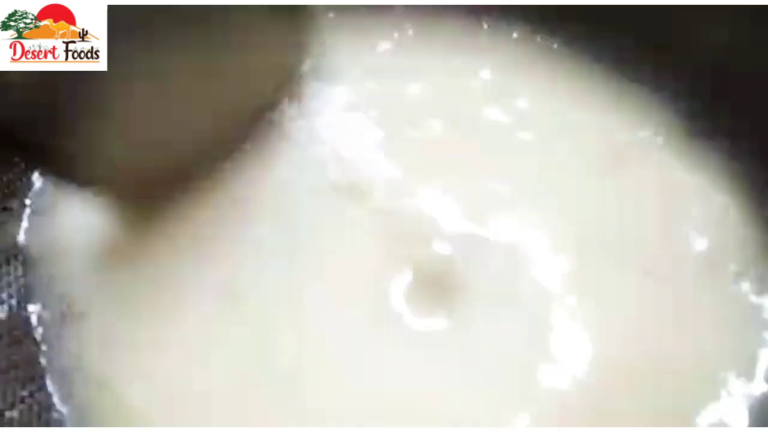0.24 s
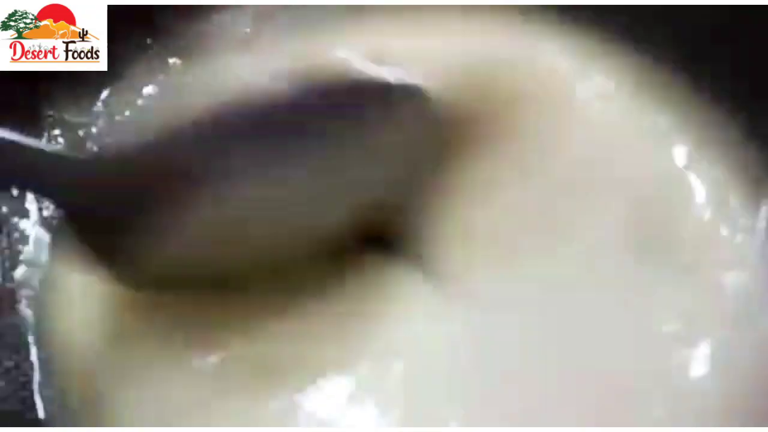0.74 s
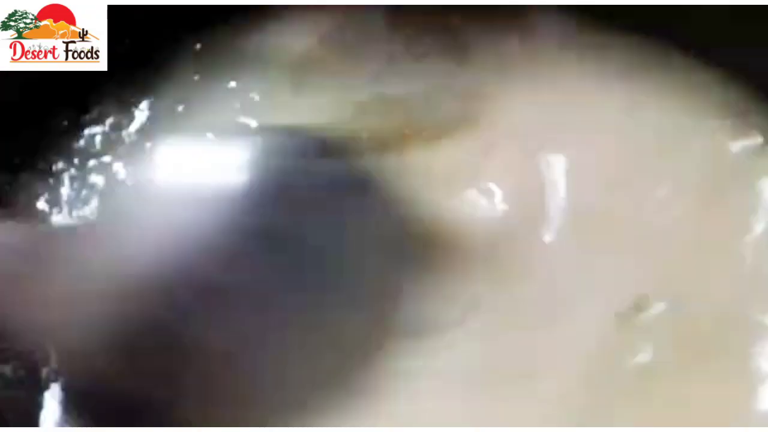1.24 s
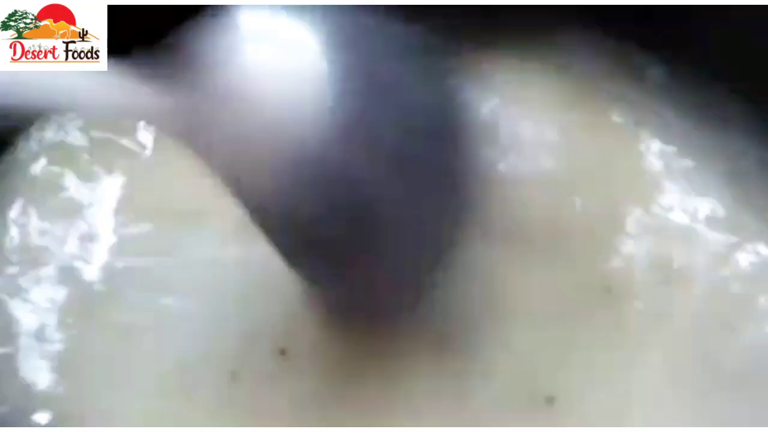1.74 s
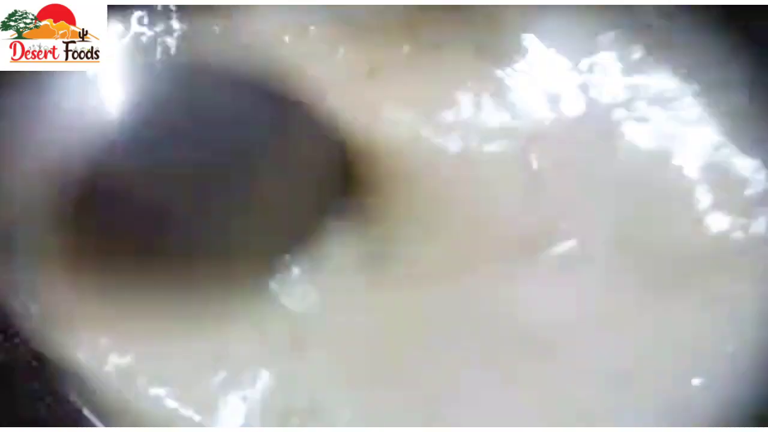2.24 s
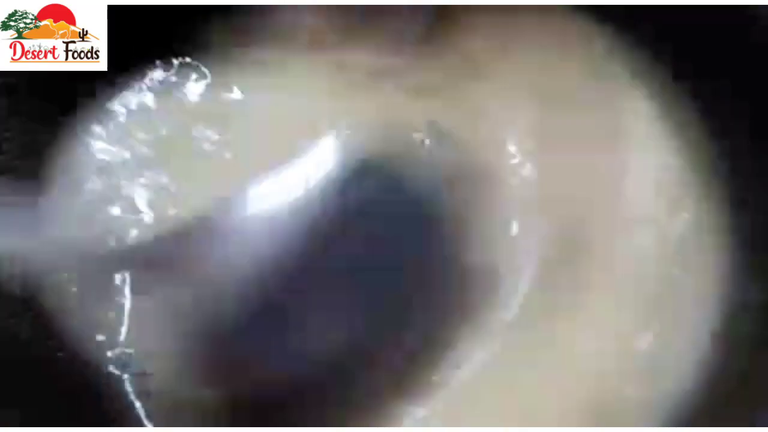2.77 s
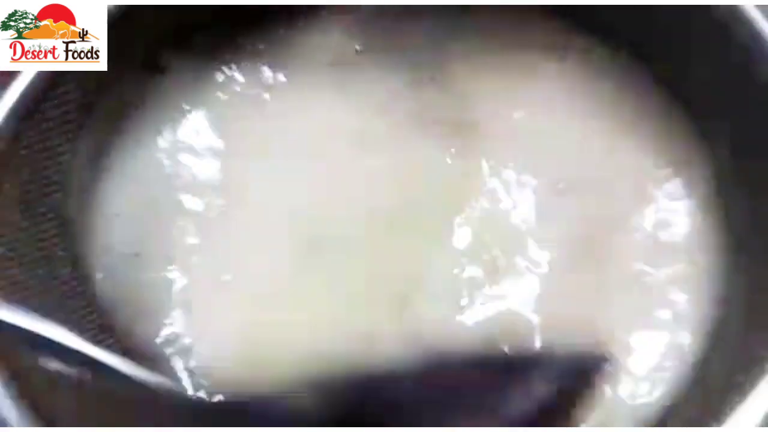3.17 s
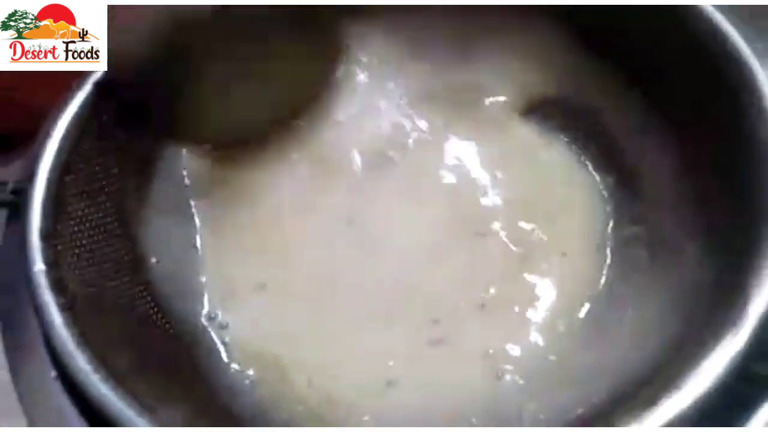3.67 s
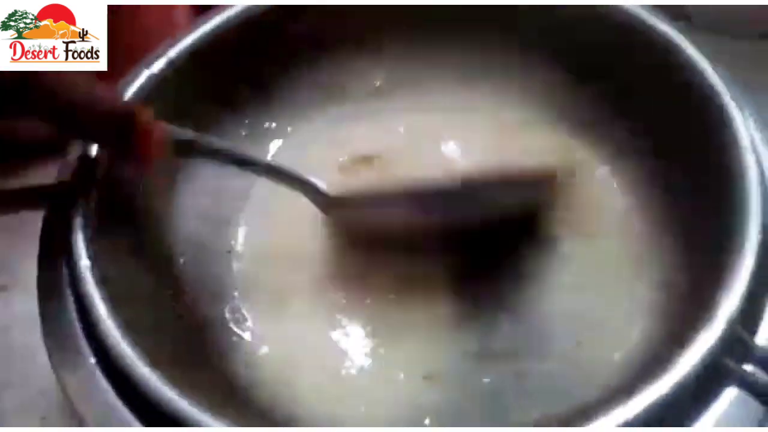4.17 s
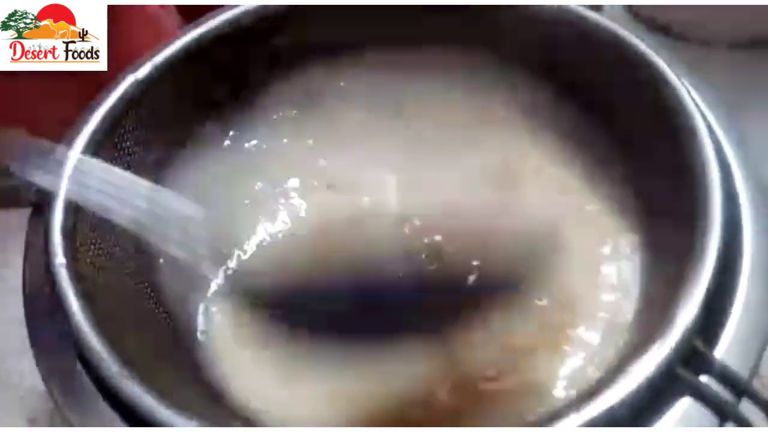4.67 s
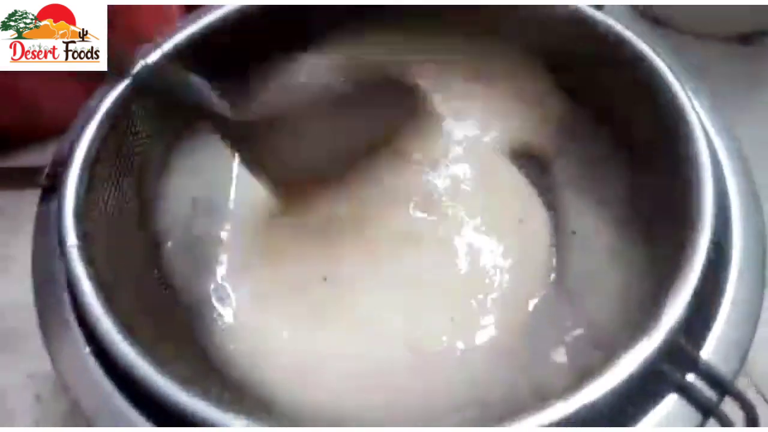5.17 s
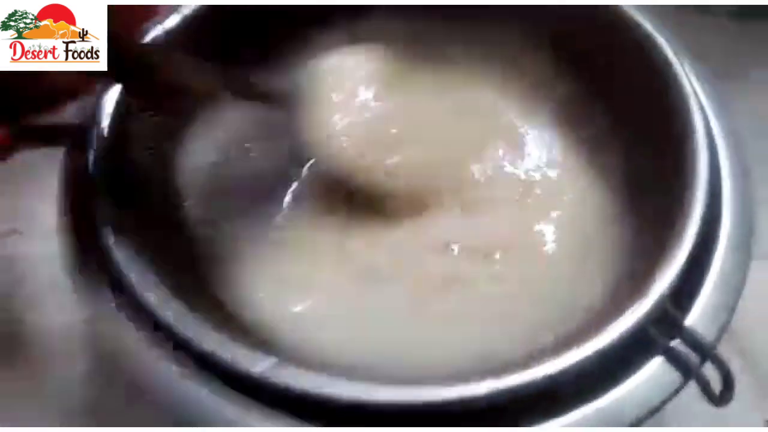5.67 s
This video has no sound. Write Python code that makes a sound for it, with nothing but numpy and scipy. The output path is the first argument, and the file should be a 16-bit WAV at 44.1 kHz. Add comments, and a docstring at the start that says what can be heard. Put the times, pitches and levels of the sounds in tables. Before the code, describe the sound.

Close up in a small kitchen, a steel spoon stirs thick pulp in a mesh strainer over a pot. The first second is quiet, with small ticks, wet gulps and a loud pot knock with rattle. Then gritty, squelching strokes come about three a second, later slowing to separate longer scrapes that soften at the end. Faint hiss and room tone sit behind.

```python
"""A steel spoon stirs wet pulp through a mesh strainer that sits on a pot, close by in a small kitchen.
Each stroke rasps: noisy slips ring the strainer's resonances while the loaded basket hums on gliding modes.
The pulp squelches in falling chirps, gulps and crackles; the spoon ticks on the steel and briefly squeaks.
Early on the pot knocks on the counter and rocks back, in ringing modes, rattle and low bumps.
The walls answer with a decaying noise tail; filtered noise makes a soft hiss and a low room tone."""
import sys
import numpy as np
from scipy import signal
from scipy.fft import rfft, irfft, next_fast_len
from scipy.io import wavfile
from scipy.ndimage import uniform_filter1d, minimum_filter1d

SR = 44100
rng = np.random.default_rng(int(sys.argv[2]) if len(sys.argv) > 2 else 0)


def put_to_file(sound):
    """Save the sound as 16-bit audio at rate SR, in the file named by the first command-line argument."""
    columns = np.atleast_2d(sound).T  # one column per channel
    safe = np.clip(columns, -1, 1)
    whole_steps = np.round(safe * 32767)
    wavfile.write(sys.argv[1], SR, whole_steps.astype(np.int16))


N = 260684  # length in samples

# The spoon pushes into the mesh. Each row: start, rise, hold and release in seconds, easing over the hold
# in dB, relative rasp, basket hum and wire sizzle in dB, lag of the hum in seconds, swell of the hum in dB,
# squelch pitch at the start in Hz.
PUSHES = [ (0.251, 0.012, 0.03, 0.13, 3, -41.5, -38.5, -40, -0.016, 12, 1900),
          (0.63, 0.06, 0.064, 0.097, 1, -41, -43, -36, -0.0031, 27, 1950),
          (1.018, 0.011, 0.15, 0.15, -2.5, -41, -37.5, -35, -0.0066, 2.5, 2000),
          (1.403, 0.08, 0.013, .06, -0.5, -17, -23.5, -21.5, -0.008, 0, 1914),
          (1.736, 0.046, 0.05, 0.084, 2, -21.5, -27, -26, -.012, -13, 2036),
          (2.047, 0.067, .028, 0.063, -1.5, -18.5, -23, -23, -.035, -2, 2246),
          (2.362, .065, 0.022, 0.073, 0, -14, -24.5, -22, -.025, -6, 2325),
          (2.66, .08, .02, 0.053, -1, -15.5, -25.5, -20, -.03, -12, 2146),
          (2.983, 0.067, 0.011, 0.055, 0, -17.5, -29, -18.5, 0.016, 8, 2362),
          (3.33, 0.031, 0.16, 0.05027, 7, -15, -32, -26.5, .03, 9.5, 2664),
          (3.706, .02, 0.1146, .08, -1, -20.5, -32.5, -40, 0.026, 10, 2449),
          (4.125, 0.0573, 0.013, 0.082, -0.5, -16.5, -33.5, -29.5, 0.018, 4, 2652),
          (4.47, 0.017, 0.11, 0.055, -2, -21, -28, -36, -0.0039, 5, 2343),
          (4.87, .03, 0.014, .165, 0.5, -14, -28, -29.5, 0.018, 10, 2265),
          (5.186, .022, 0.095, .07, -0.5, -24.5, -34, -45, .012, 2, 2442),
          (5.667, 0.044, .016, .13, -1, -27.5, -33.5, -45, 0.018, -9, 2494), ]
# The spoon slides lightly back through the pulp. Each row: start and length in seconds,
# relative rasp, basket hum and wire sizzle in dB.
RETURNS = [(1.321, 0.098, -119, -30.5, -46), (1.589, 0.031, -33, -24.5, -36), (1.65, 0.044, -36, -22, -31),
           (1.919, 0.036, -30, -31.5, -38), (1.968, 0.056, -34, -23.5, -27),
           (2.251, .035, -29, -38.5, -34.5), (2.308, 0.034, -36, -30.5, -30), (2.572, .05, -28, -35, -32),
           (2.849, 0.04, -24, -38, -28), (2.936, 0.029, -29, -26.5, -26.5), (3.282, 0.053, -43, -81, -33),
           (4.808, 0.035, -45.5, -55.5, -46), (5.529, 0.024, -42.5, -64, -48)]
# During the quick stirring the spoon never leaves the mesh. One row: start and length in seconds,
# relative rasp, basket hum and wire sizzle in dB.
DRAG = (1.3, 1.5, -52, -48, -39.5)
# Broad resonances of rim, spoon and wires. Each row: pitch in Hz, width of each of two passes in Hz,
# relative level in dB.
STRAINER = [(83.5, 240, -32), (767.7, 42, -8.5), (1028, 310, -14.5), (1250, 170, -1), (1739, 194, -9.5),
            (2017, 216, -4.5), (2476, 410, -2.5), (2766, 140, -6), (3600, 710, -10.5), (4115, 760, -8.5),
            (4370, 85, -18.5), (5170, 1400, -8.5), (6470, 760, -8.5), (8400, 2700, -2), (10670, 1800, -7.5),
            (12800, 1100, -13)]
# Stereo width of the scrape. Each row: frequency in Hz, side level against the middle in dB.
SCRAPE_WIDTH = [(2800, -83), (4300, -58), (7000, -11.5), (12000, -5.5)]
# Treble slope of the scrape about 8 kHz. Each row: time in seconds, slope in dB per octave.
BRIGHTNESS = [(1.2, 2.5), (1.8, -2), (2.4, -1), (2.95, 4), (3.4, -3.5), (4.55, -4.5), (5.27, 4.5)]
# The basket's modes. Each row: multiple of its note, width of each of two passes in Hz, relative level in dB.
BASKET_MODES = [(.58, 56, -24.5), (.88, 74, -10), (1, 68, -7.5), (1.17, 107, -9.5)]
# Air pockets gulping in the pulp. Each row: start in seconds, peak in dB, middle pitch in Hz,
# length in seconds.
GULPS = [(0.688, -19, 600, 0.028), (0.725, -21, 618, 0.0172), (0.743, -24, 544, 0.0155),
         (1.167, -24, 604, 0.027), (1.325, -28, 601, 0.026), (1.687, -22, 670, 0.012),
         (1.989, -15, 645, 0.0346), (2.616, -21.5, 636.4, 0.017), (2.955, -21, 729, 0.016),
         (3.513, -19, 780, 0.037), (3.856, -31, 744, .028), (4.922, -18, 954, 0.027)]
# Spoon edge on steel. Each row: start in seconds, relative bright tick in dB, relative dull clack in dB,
# clack pitch in Hz.
TICKS = [(0.2604, -11.5, -26, 2080), (0.632, -13.5, -26, 2730), (0.987, -12, -59.5, 2220),
         (1.029, -17, -39, 2290), (1.3067, -14, -46, 1834), (1.36, -19, -57, 2100),
         (1.6064, -34, -30, 2920), (1.664, -13, -29.5, 2680), (2.255, -36, -32, 2740),
         (2.323, -2.5, -50, 2510), (2.6427, -2.5, -31, 2540), (2.929, -10, -29, 1990),
         (2.9405, -17, -44, 1597), (3.262, 3.5, -46.5, 2250), (3.2851, -20, -32, 2300),
         (3.2938, 1, -35, 2130), (3.7109, -23, -24.5, 2104), (4.0892, -19.5, -40, 2310),
         (4.373, -26.5, -50, 2050), (4.475, -16, -17.5, 2110), (4.5446, -23, -10, 2070),
         (4.55, -10, -11.5, 2293), (4.8053, -23, -28, 2600), (5.2018, -50, -27, 2040),
         (5.53, -21.5, -29, 2310)]
# The spoon's edge on a wire. Each row: pitch in Hz, width in Hz, relative level in dB.
EDGE_MODES = [(6980, 490, -4.5), (9000, 4000, -11.5), (10250, 2300, -8.5), (11300, 2000, -40)]
# The spoon's tip skating over the wires. Each row: start in seconds, level in dB, length in seconds,
# pitch in Hz.
SKITTERS = [(2.32, -23.5, 0.018, 7830), (2.93, -21, 0.032, 8276), (2.931, -27, 0.029, 11730)]
# Pot on the counter. Each row: start in seconds, rms of the first 10 ms in dB.
KNOCKS = [(0.385, -30), (0.391, -7), (0.4888, -18.5), (0.5241, -20.5)]
# The pot's modes. Each row: pitch in Hz, relative level in dB, time to fall 60 dB in seconds.
POT_MODES = [(152, -34, 0.24), (281.4, -27.5, 0.32), (429, -15, 0.087), (668, -7, 0.06), (984, -0.5, 0.041),
             (1027, 11.5, 0.016), (1357, -10.5, 0.066), (1643, -13.5, 0.083), (1960, -16, 0.045),
             (2210, -30.5, 0.23), (2570, -13, 0.052), (5540, -13, 0.025), (7680, -13, 0.057)]
# Spectrum of the loose strainer's rattle. Each row: frequency in Hz, relative level in dB.
RATTLE_SPECTRUM = [(29, -53), (50, -17.5), (272, -25), (356, -28), (446, -2), (511, -22), (612, -2),
                   (840, -18), (1010, -7), (1650, -10.5), (2120, -23), (2370, -18), (3400, -39),
                   (7840, -36), (11000, -41), (14300, -74), (22000, -120)]
# Soft bumps of the pot. Each row: start in seconds, relative level in dB, pitch in Hz.
BUMPS = [(0.3839, -7, 260), (0.486, -11, 267), (0.516, -12.5, 250), (3.932, -33.5, 107),
         (3.963, -31, 141.5), (4.131, -36, 89.8), (4.487, -39, 88), (4.551, -41, 74.8), (4.8, -38, 120),
         (5.22, -41.5, 89), (5.849, -40.5, 78.6)]
# Decay of the kitchen. Each row: frequency in Hz, time to fall 60 dB in seconds.
KITCHEN_DECAY = [(150, 0.68), (700, 0.35), (2200, 0.44), (5000, 0.52), (12000, 0.065)]
# Spectrum of the room tone. Each row: frequency in Hz, relative level in dB.
ROOM_SPECTRUM = [(20, -40), (40, -21), (65, 4), (120, -20.5), (210, -13.5), (295, 2.5), (370, -13),
                 (560, -3), (720, 1.5), (1500, -4), (2700, -8), (4500, -23), (8000, -29.5), (14500, -26.5)]
# Spectrum of the hiss. Each row: frequency in Hz, relative level in dB.
HISS_SPECTRUM = [(2350, -61), (4000, -48), (5050, -36), (5190, -42), (7680, -22), (8820, -23), (13700, -46),
                 (15000, -92)]
# Loudness of the hiss. Each row: time in seconds, level in dB.
HISS_LEVEL = [(0, -46), (0.9, -53), (2.498, -51), (3.199, -51.5), (3.7, -71), (5.9, -66.5)]

RETURN_RISE_S, RETURN_RELEASE_S = 0.02477, 0.04124
EDGE_DB = 22  # a stroke climbs this far in its rise and drops as far in its release
RELEASE_CURVE = 1.1  # exponent: the hand lets go gently, then faster
FOLLOW_THROUGH_S = 0.043  # the spoon keeps travelling after the hand eases
REST_DB = -72  # the pulp settling between strokes
GLANCING_HZ = 2160  # the squelch where the spoon only slides
SQUELCH_FALL_OCT_PER_S = 3.81  # as the spoon digs in
# the basket's note: pressed firmly when full, its rise as pulp drains, its rise with the spoon's pressure
BASKET_HZ, DRAIN_HZ_PER_S, TENSION_HZ_PER_DB = 678.8, 19, 3.5
SLACK_DB, FIRM_DB = -43, -21  # rasp at which the mesh hangs slack, and at a firm press
TOP_HZ = 14350  # band limit


def force_db(age, rise, hold, release):
    """The hand's force through one stroke, in dB below its top."""
    before_top = np.maximum(1 - age / rise, 0) ** 2
    after_hold = (np.maximum(age - rise - hold, 0) / release) ** RELEASE_CURVE
    return -EDGE_DB * np.minimum(before_top + after_hold, 10)


def stroke_controls():
    """Hum, rasp and sizzle gains and squelch pitch: strokes rise, hold and release as the squelch falls."""
    t = np.arange(N) / SR
    light = [(s, RETURN_RISE_S, length - RETURN_RISE_S, RETURN_RELEASE_S, 0, *levels, 0, 0, GLANCING_HZ)
             for s, length, *levels in RETURNS]
    start, length, *drag_db = DRAG
    dragging = force_db(t - start, RETURN_RISE_S, length, RETURN_RELEASE_S)
    # strokes add up as powers
    rasp, hum, sizzle = [amp(db + dragging) ** 2 + amp(REST_DB) ** 2 for db in drag_db]
    pitch = rasp * GLANCING_HZ  # averaged with the rasp power as weight
    for (s, rise, hold, release, easing_db, rasp_db, hum_db, sizzle_db,
         lag, swell_db, start_hz) in PUSHES + light:
        age = t - s
        moving_s = rise + hold + FOLLOW_THROUGH_S
        dug_s = np.clip(age, 0, moving_s)
        easing = easing_db * np.interp(age, [rise, rise + abs(hold)], [.5, -.5])
        force = force_db(age, rise, hold, release) + easing
        push = amp(rasp_db + force) ** 2
        rasp = rasp + push
        sizzle = sizzle + amp(sizzle_db + force) ** 2
        swell = swell_db * (dug_s / moving_s - .5)
        hum = hum + amp(hum_db + force_db(age - lag, rise, hold, release) + swell) ** 2
        pitch = pitch + push * start_hz * 2 ** (-SQUELCH_FALL_OCT_PER_S * dug_s)
    return np.sqrt(hum), np.sqrt(rasp), np.sqrt(sizzle), pitch / rasp


def scraping(hum, rasp, sizzle, squelch_hz, smear=0.94, lumps_db=2.12, below_db=22, above_db=7):
    """The spoon slips over the wires, and the slips ring the whole strainer."""
    out = np.zeros((2, N))
    slips = snaps(rate=2400, scatter_db=-0.5)
    lumps = lumps_db * wobble(170)
    slope_db = np.interp(np.arange(N) / SR, *np.transpose(BRIGHTNESS))
    for hz, width, db in STRAINER:
        drive = slips + smear * rng.standard_normal(N)  # wet pulp smears the slips into noise
        ring = unit(steep(drive, hz, width))
        side = amp(along(SCRAPE_WIDTH, hz)) * unit(steep(rng.standard_normal(N), hz, width))
        # low resonances follow the flexing basket, high ones the wires, the middle ones the spoon's pressure
        low = along([(900, 0.36), (2000, 0.026)], hz)
        high = along([(2700, 0.18), (6000, 1.0)], hz)
        level = hum ** low * sizzle ** high * rasp ** (1 - low - high)
        # middle resonances below the pitch of the pocket under the spoon stay shut, so a push opens downward
        focus_db = np.where(hz < squelch_hz, below_db, above_db)
        in_middle = 1100 < hz < 3000
        detuning = in_middle * np.minimum(np.log2(hz / squelch_hz) ** 2, 1)
        treble_octaves = (hz > 3000) * np.log2(hz / 8000)
        shade_db = db + lumps - focus_db * detuning + slope_db * treble_octaves
        out += level * amp(shade_db) * stereo(ring, side)
    return amp(-2.5) * patchy(out, depth_db=4.0)


def patchy(x, depth_db):
    """Shifting pulp damps patches of the spectrum for some milliseconds at a time."""
    z = signal.stft(x, nperseg=256)[2]
    field = uniform_filter1d(rng.standard_normal(z.shape[1:]), size=2, axis=0)  # across frequency
    field = uniform_filter1d(field, size=6, axis=1)  # across time
    y = signal.istft(z * amp(depth_db * unit(field)), nperseg=256)[1][:, :N]
    return y * np.std(x) / np.std(y)


def basket_note(rasp):
    """The note climbs as the pulp drains, and whenever the spoon pulls the mesh taut."""
    pressure_db = np.maximum(20 * np.log10(rasp), SLACK_DB) - FIRM_DB
    return BASKET_HZ + DRAIN_HZ_PER_S * np.arange(N) / SR + TENSION_HZ_PER_DB * pressure_db


def basket(hum, note_hz, unevenness_db=2):
    """The loaded basket hums; its modes slide together with its note."""
    cycles = np.cumsum(note_hz) / SR
    out = np.zeros(N)
    for multiple, width, db in BASKET_MODES:
        # slow noise on a cosine and a sine makes a narrow band that can glide
        slow = filtered(rng.standard_normal((2, N)), lambda f: 1 / (1 + 2j * f / width) ** 2)
        a, b = unit(slow)
        phase = 2 * np.pi * multiple * cycles
        out += amp(db) * (a * np.cos(phase) + b * np.sin(phase))
    return hum * amp(unevenness_db * wobble(60)) * out


def squelches(rasp, squelch_hz, count=900, length=0.023, sag=0.066):
    """Small pockets open in the pulp under the spoon, each a short falling chirp."""
    out = np.zeros(N)
    for when, pitch, size in rng.random((count, 3)):
        i = int(when * (N - 1))
        hz = squelch_hz[i] * np.interp(pitch, [0, 1], [.68, 1.06])
        add(out, i / SR, rasp[i] * size * bubble(hz, length, sag))
    return amp(-3.5) * out


def wet_crackle(sizzle, growth=0.64):
    """Thin films of pulp snap on the mesh wherever the spoon moves."""
    return amp(-24.5) * sizzle ** growth * unit(ringing(snaps(rate=130, scatter_db=5.5), EDGE_MODES))


def gulps():
    """Large air pockets behind the spoon."""
    out = np.zeros(N)
    for s, db, hz, length in GULPS:
        add(out, s, amp(db) * bubble(hz, length, sag=0.18))
    return out


def bubble(hz, length, sag):
    """A pocket of air that swells and fades, its pitch sagging as it opens."""
    u = np.linspace(0, 1, int(length * SR))
    cycles = np.cumsum(hz * (1 + sag * (.5 - u))) / SR
    return np.sin(np.pi * u) * np.sin(2 * np.pi * cycles)


def ticks():
    """A short contact rings the spoon's edge and, when firm, the strainer's rim."""
    out, t = np.zeros(N), np.arange(SR // 10) / SR
    for s, tick_db, clack_db, clack_hz in TICKS:
        # a fast decay over a quieter, slower one
        blow = rng.standard_normal(len(t)) * (amp(-60 * t / 0.0055) + amp(-13 - 60 * t / 0.075))
        blow[0] += amp(15.5)  # the contact itself, ahead of its grit
        edge = ringing(blow, EDGE_MODES)
        rim = steep(blow, clack_hz, width_hz=500)
        tick = amp(tick_db - 6.0) * edge / np.abs(edge).max()
        clack = amp(clack_db + 6.5) * rim / np.abs(rim).max()
        add(out, s, tick + clack)
    return out


def skitters():
    """The tip skates for a moment: a thin, gritty squeak of narrow-band noise."""
    out = np.zeros(N)
    for s, db, length, hz in SKITTERS:
        u = np.linspace(0, 1, int(length * SR))
        grit = unit(steep(rng.standard_normal(len(u)), hz, width_hz=1120))
        add(out, s, amp(db) * np.sqrt(4 * u * (1 - u)) * grit)
    return out


def pot_knocks(dulling=0.26):
    """The pot strikes the counter, softer blows sounding duller; the loose strainer rattles on after each."""
    out, t = np.zeros(N), np.arange(SR) / SR
    for s, db in KNOCKS:
        ring = np.zeros(len(t))
        for hz, level, t60 in POT_MODES:
            tilt_db = dulling * db * max(np.log2(hz / 2000), 0)
            mode_db = level + rng.normal(0, 1) + tilt_db - 60 * t / t60
            ring += amp(mode_db) * np.sin(2 * np.pi * hz * t)
        # a harder blow shakes the strainer more
        rattle = amp(-13.5 + .5 * db - 60 * t / 0.65) * coloured(rng.standard_normal(len(t)), RATTLE_SPECTRUM)
        blow = (ring + rattle) * (1 - np.exp(-t / 0.0022))
        add(out, s, amp(db) * blow / np.std(blow[:SR // 100]))
    return out


def pot_bumps():
    """A soft push on the pot: a few low cycles, 60 dB down after nine."""
    out, t = np.zeros(N), np.arange(SR // 4) / SR
    for s, db, hz in BUMPS:
        decay = amp(db - 2.0 - 60 * t * hz / 9)
        add(out, s, decay * np.sin(2 * np.pi * hz * t) * (1 - np.exp(-t / 0.0013)))
    return out


def kitchen(x):
    """Hard walls answer; each frequency dies at its own speed."""
    hz, t, z = signal.stft(rng.standard_normal(SR), SR, nperseg=256)
    decay = amp(-60 * t / along(KITCHEN_DECAY, hz)[:, None])
    tail = signal.istft(z * decay, SR, nperseg=256)[1]
    tail = tail * (1 - np.exp(-np.arange(len(tail)) / SR / 0.0009))
    wet = signal.fftconvolve(x, tail[None] / np.linalg.norm(tail), axes=1)[:, :N]
    return filtered(wet, lambda f: amp(along([(200, 7), (2200, -2.0), (4000, -9), (12000, 5)], f)))


def background():
    """Room tone with a faint hum, and a high hiss that fades away past halfway, all filtered noise."""
    noise = lambda: rng.standard_normal(N)
    tone = amp(-49.5) * coloured(noise(), ROOM_SPECTRUM)
    faint_hum = amp(-61.5) * unit(ringing(noise(), [(94, 49, -11.0), (293, 17, -3.5)]))
    hiss = stereo(coloured(noise(), HISS_SPECTRUM), amp(-18) * coloured(noise(), HISS_SPECTRUM))
    hiss_gain = amp(np.interp(np.arange(N) / SR, *np.transpose(HISS_LEVEL)))
    return tone + faint_hum + hiss_gain * hiss


def amp(db):
    """Decibels to gain."""
    return 10 ** (np.asarray(db) / 20)


def unit(x):
    """Scale to rms 1."""
    return x / np.sqrt(np.mean(x ** 2) + 1e-20)


def along(points, hz):
    """(Hz, value) points read on a log axis."""
    f, v = np.transpose(points)
    return np.interp(np.log(hz + 1), np.log(f + 1), v)


def filtered(x, response):
    """x times a response of frequency."""
    size = x.shape[-1]
    m = next_fast_len(size + SR // 2)  # padded, so that ringing does not wrap round
    return irfft(rfft(x, m) * response(np.fft.rfftfreq(m, 1 / SR)), m)[..., :size]


def coloured(x, spectrum):
    """x shaped by the given spectrum, at rms 1."""
    return unit(filtered(x, lambda hz: amp(along(spectrum, hz))))


def resonance(f, hz, width_hz):
    """Response of one resonance, 1 at its centre."""
    return 1j * f * width_hz / (hz * hz - f * f + 1j * f * width_hz)


def ringing(x, modes):
    """x through a set of resonances of alternating sign."""
    return filtered(x, lambda f: sum((-1) ** k * amp(db) * resonance(f, hz, width)
                                     for k, (hz, width, db) in enumerate(modes)))


def steep(x, hz, width_hz):
    """x through one resonance twice, which keeps the valleys beside it dark."""
    return filtered(x, lambda f: resonance(f, hz, width_hz) ** 2)


def snaps(rate, scatter_db):
    """Single impulses at random times and of random sizes, at rms 1."""
    happens = rng.random(N) < rate / SR
    size = amp(scatter_db * np.minimum(rng.standard_normal(N), 2))
    return unit(happens * rng.choice([-1, 1], N) * size)


def wobble(rate):
    """A random curve of straight pieces, rate knots a second."""
    knots = rng.standard_normal(int(N * rate / SR) + 4)
    return np.interp(np.arange(N) * rate / SR, np.arange(len(knots)), knots)


def add(track, s, sound):
    """Mix a sound into a track at time s."""
    part = track[..., round(s * SR):][..., :sound.shape[-1]]
    part += sound[..., :part.shape[-1]]


def stereo(mid, side):
    """Left and right from mid and side."""
    return np.array([mid + side, mid - side])


def scene():
    """Everything at the strainer, in the kitchen."""
    hum, rasp, sizzle, squelch_hz = stroke_controls()
    strainer = scraping(hum, rasp, sizzle, squelch_hz) + basket(hum, basket_note(rasp))
    pulp = squelches(rasp, squelch_hz) + wet_crackle(sizzle) + gulps()
    spoon = ticks() + skitters()
    pot = pot_knocks() + pot_bumps()
    near = strainer + pulp + spoon + pot
    return near + amp(-12.5) * kitchen(near) + background()


def record(dry):
    """A limiter turns down the loudest peaks; a steep low-pass then cuts the top at the band limit."""
    needed = np.minimum(1, .95 / (np.abs(dry).max(axis=0) + 1e-9))
    gain = uniform_filter1d(minimum_filter1d(needed, size=200), size=200)
    return filtered(dry * gain, lambda hz: 1 / np.sqrt(1 + (hz / TOP_HZ) ** 180))


dry = scene()
out = record(dry)
put_to_file(out)
```